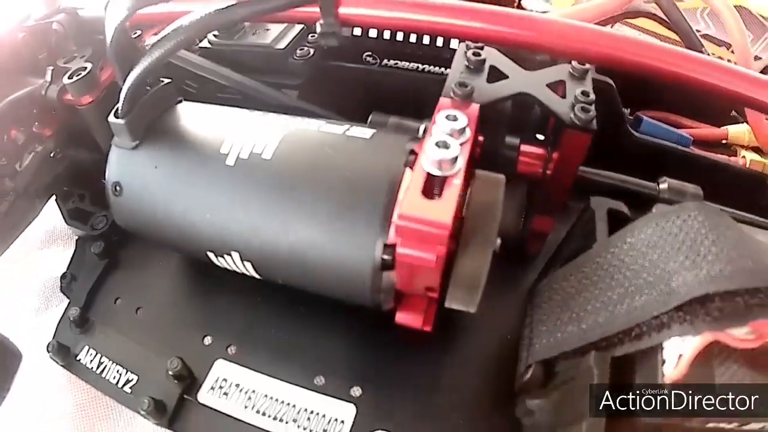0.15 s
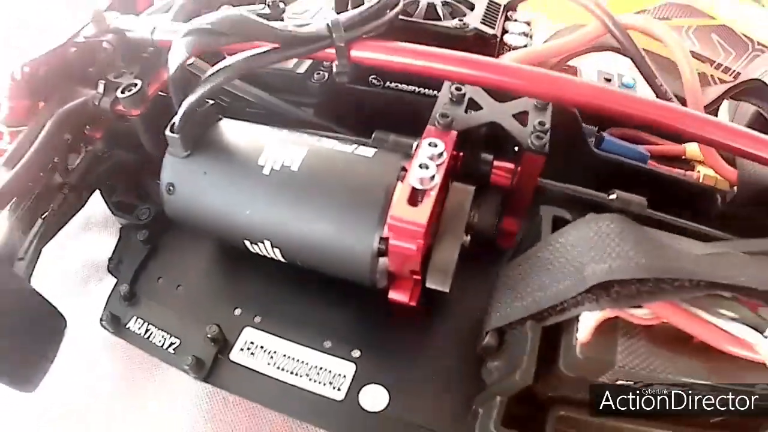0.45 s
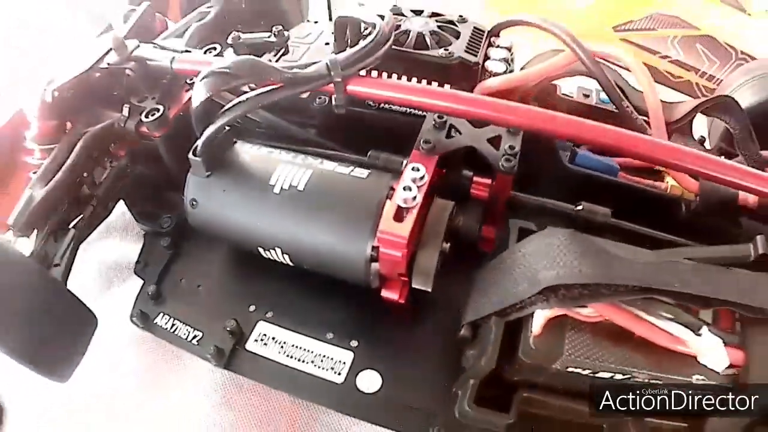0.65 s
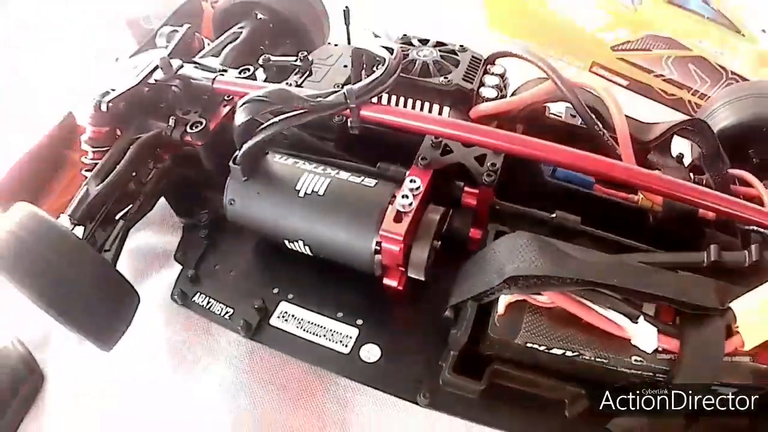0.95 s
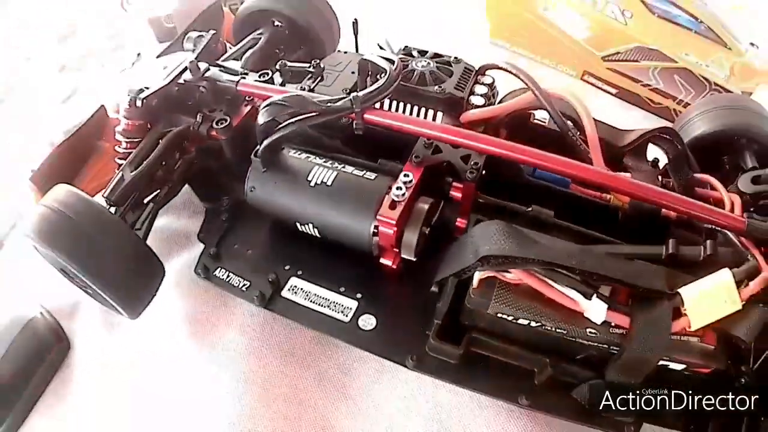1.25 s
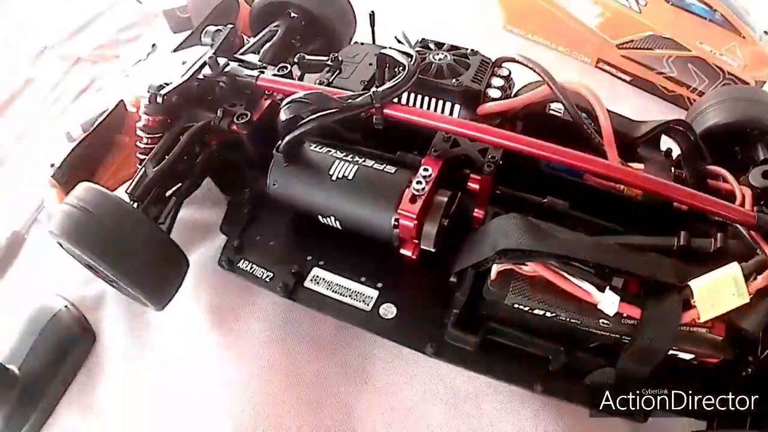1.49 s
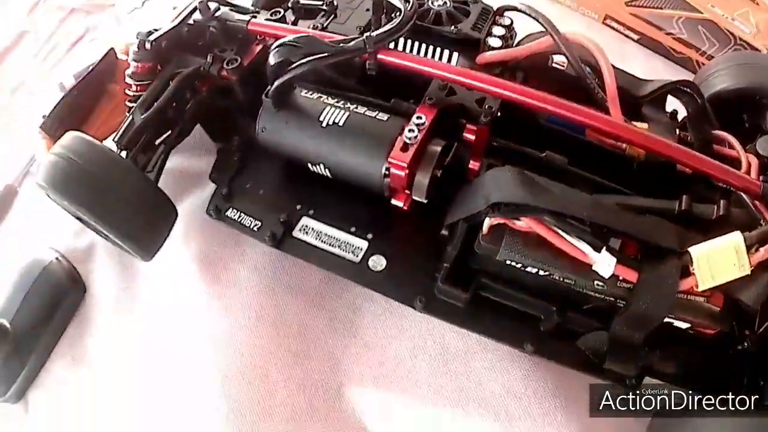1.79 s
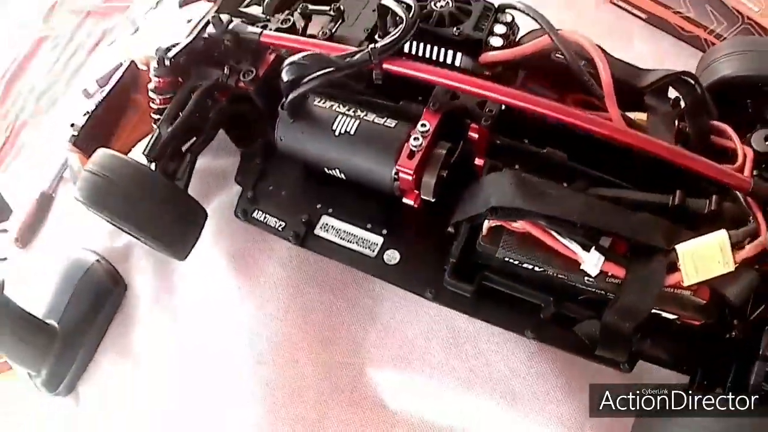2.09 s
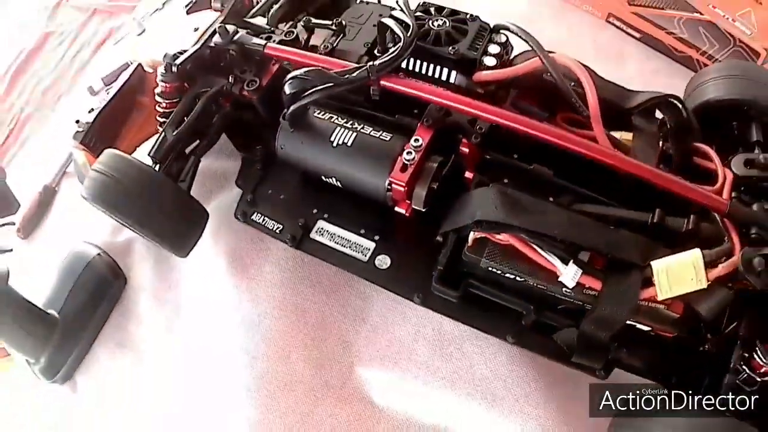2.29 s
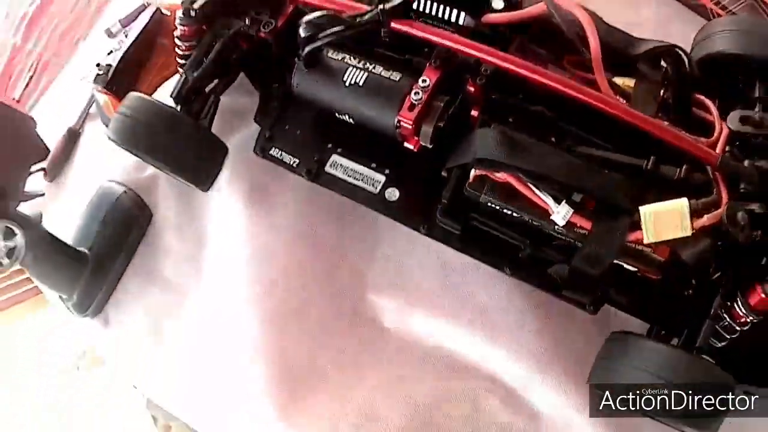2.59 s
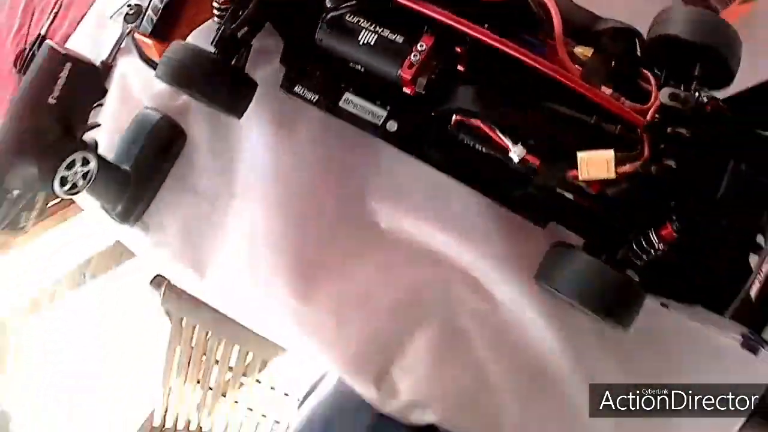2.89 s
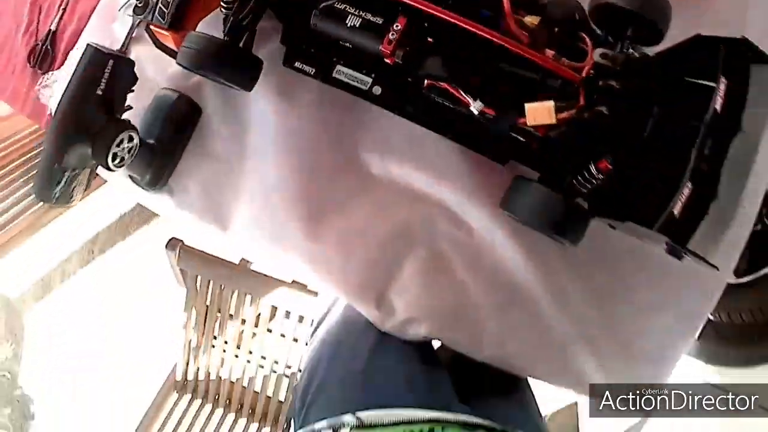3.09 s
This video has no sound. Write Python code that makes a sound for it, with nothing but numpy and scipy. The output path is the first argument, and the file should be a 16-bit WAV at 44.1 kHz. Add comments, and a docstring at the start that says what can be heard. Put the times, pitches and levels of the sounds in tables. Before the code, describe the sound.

The gears of a radio-controlled car coast down, whirring with quick, irregular clicks and a low hum. Loudest at first, the sound grows steadily lower, duller and quieter, heard from close up in a quiet room.

```python
"""In a room, close to a model car whose drivetrain coasts down with its wheels off the ground.
Two spinning shafts are a little off balance and shake the chassis with a low hum. The gears whirr as
tooth clicks on tooth, and they chatter in short uneven bursts as the slack between them is taken up.
The clicks ring through the chassis, and the sound sinks in pitch and fades as the shafts slow."""
import sys
import numpy as np
from scipy import signal
from scipy.fft import rfft, irfft, next_fast_len
from scipy.io import wavfile
from scipy.ndimage import uniform_filter1d, minimum_filter1d

SR = 44100
rng = np.random.default_rng(int(sys.argv[2]) if len(sys.argv) > 2 else 0)


def unload_wav(signal):
    """Save mono or channel-first audio to the path in sys.argv[1] as 16-bit WAV at rate SR, clipped to [-1, 1]."""
    wavfile.write(
        sys.argv[1],
        SR,
        np.round(np.clip(np.atleast_2d(signal).T, -1, 1) * 32767).astype(np.int16),
    )


N = 143325
T = np.arange(N) / SR
SIZE = next_fast_len(N + SR)  # a spare second gives filters room to ring out
HZ = np.maximum(np.arange(SIZE // 2 + 1) * SR / SIZE, 1)
TEETH = 42  # on the gear of the main shaft

# How fast the main shaft spins: (time [s], speed [turns per second])
SHAFT_SPEED = [(0, 60), (.5, 50.5), (1, 41.2), (1.5, 33.3), (2, 26.5), (2.6, 20.3), (3.25, 15)]


def from_db(db):
    """Turn decibels into a number to multiply by."""
    return 10 ** (np.asarray(db) / 20)


def rms_one(x):
    """Scale a signal so that its average power is 1."""
    return x / np.sqrt(np.mean(x ** 2) + 1e-20)


def in_time(rows):
    """Join (time, value) points with straight lines, giving a value for every sample."""
    return np.interp(T, *np.transpose(rows))


def colour(points):
    """Join (frequency, level) points into a tone colour: a level in dB for every frequency."""
    hz, db = np.transpose(points)
    return np.interp(np.log(HZ), np.log(hz), db)


def drift(rate_hz):
    """A random wobble of about size 1, mostly slower than rate_hz."""
    spectrum = rfft(rng.standard_normal(SIZE)) / (1 + (HZ / rate_hz) ** 2)
    return rms_one(irfft(spectrum, SIZE)[:N])


def shape_tone(x, gain_db):
    """Turn each frequency up or down, so that ringing only follows a click (a minimum-phase filter)."""
    cepstrum = irfft(np.log(from_db(gain_db)), SIZE)
    cepstrum[1:SIZE // 2] *= 2
    cepstrum[SIZE // 2 + 1:] = 0
    return irfft(rfft(x, SIZE) * np.exp(rfft(cepstrum)), SIZE)[:N]


def shaft_shake(turns):
    """Two off-balance shafts hum low falling tones; the faster one wavers and dies away sooner."""
    # Hum of the main shaft: (time [s], level [dB])
    main_levels = [(0, -31), (.45, -32.5), (1, -35), (1.4, -39.5), (2, -43), (2.4, -57.5), (3.25, -53.5)]
    # Hum of the faster shaft: (time [s], level [dB])
    fast_levels = [(0, -37.5), (.25, -32), (.4, -41.5), (.55, -32.5), (.85, -39), (1, -43), (1.25, -45),
                   (1.85, -48.5), (2.2, -60), (3.25, -69)]
    speed_ratio, octave_db = 2.82, -30.5
    angle = 2 * np.pi * turns
    main_hum = from_db(in_time(main_levels)) * (np.sin(angle) + from_db(octave_db) * np.sin(2 * angle))
    fast_hum = from_db(in_time(fast_levels)) * np.sin(speed_ratio * angle + drift(16))
    return np.sqrt(2) * (main_hum + fast_hum)


def tooth_clicks(turns, spread_db=2, grit_db=-2):
    """Each gear tooth clicks as it meets another, uneven in time and strength, with fine grit between."""
    count = int(turns[-1] * TEETH)
    timing, strength = rng.standard_normal((N, 2))[:count].T
    contacts = np.arange(count) + .14 * timing  # early or late by a small part of a tooth spacing
    starts = np.searchsorted(turns * TEETH, contacts).clip(0, N - 1)
    clicks = np.zeros(N)
    clicks[starts] = from_db(spread_db * strength.clip(-1.5, 1.5)) * rng.choice([-1, 1], N)[:count]
    clicks /= np.sqrt(in_time(SHAFT_SPEED))  # keeps the power even as the clicks thin out
    return rms_one(rms_one(clicks) + from_db(grit_db) * rng.standard_normal(N))


def chassis_ring(force, tone):
    """A force makes the chassis ring at its own pitches, on top of the given tone colour."""
    # Peaks and dips in how the chassis rings: (frequency [Hz], width [Hz], boost [dB])
    resonances = [(632, 45, 4.5), (628, 20, -9.5), (660, 27, -1.5), (745.5, 51, 4), (896, 39, -4),
                  (992, 70, 5), (1320, 57, 3), (1484, 100, 0), (1778, 70, 2), (2420, 68, -0.5),
                  (3200, 220, 2.5)]
    db = colour(tone) + sum(boost / (1 + (2 * (HZ - hz) / width) ** 2) for hz, width, boost in resonances)
    average_db = 10 * np.log10(np.mean(from_db(db) ** 2))
    return shape_tone(force, db - average_db)


def gear_whirr(turns, speed):
    """Tooth clicks blur into a whirr that dulls as it slows, with the growl of a slower pair of gears."""
    # Loudness of the whirr: (time [s], level [dB])
    levels = [(0, -16), (.4, -20.5), (.6, -21.5), (.85, -22.5), (1.25, -27), (1.7, -30), (2.1, -29.5),
              (2.7, -33), (3.0, -36), (3.25, -33.5)]
    # Tone colour at the highest speed: (frequency [Hz], level [dB])
    fast_tone = [(70, -17), (200, -9), (450, -8.5), (700, -4), (1300, -2.5), (1700, -6.5), (2400, -10),
                 (3100, -17), (4000, -25.5), (5800, -32.5), (10500, -44.5), (14000, -49.5)]
    # Tone colour at the lowest speed: (frequency [Hz], level [dB])
    slow_tone = [(70, -11.5), (200, -22.5), (430, -17), (700, -1.5), (1050, 2), (1600, -6), (2300, -8.5),
                 (3100, -19.5), (4000, -29), (5800, -32), (10500, -46), (14000, -45)]
    flutter_db, flutter_hz = 2.5, 50
    growl_cycles_per_turn, growl_db, growl_width_hz = 23, -5.5, 140
    loudness = from_db(in_time(levels) + flutter_db * drift(flutter_hz))
    fast_share = (speed - speed.min()) / np.ptp(speed)  # 1 at the start, 0 at the end
    force = loudness * tooth_clicks(turns)
    whirr = chassis_ring(force * fast_share, fast_tone) + chassis_ring(force * (1 - fast_share), slow_tone)
    angle = 2 * np.pi * growl_cycles_per_turn * turns
    growl = drift(growl_width_hz) * np.sin(angle) + drift(growl_width_hz) * np.cos(angle)  # a rough tone
    return whirr + from_db(growl_db) * loudness * fast_share * growl


def bursts(times, levels_db, widths_s):
    """A loudness curve that swells briefly each time the teeth press together and part again."""
    power = np.zeros(N)
    for time, db, width in zip(times, levels_db, widths_s):
        middle = int(time * SR)
        near = slice(max(middle - SR // 20, 0), middle + SR // 20)
        power[near] += from_db(db) ** 2 * np.exp(-((T[near] - time) / width) ** 2)
    return np.sqrt(power)


def tooth_chatter(turns):
    """Each time the slack is taken up, the teeth knock the chassis, rasp brightly and chirp."""
    # Bursts of chatter, with levels before each part's own offset:
    # (time [s], half-length of the rasp [s], knock level [dB], chirp level [dB], rasp level [dB])
    events = [(0.032, 0.0041, -11.5, -13.5, -19), (0.069, 0.0013, -26, -15, -22),
              (0.115, 0.0017, -22, -7, -10.5), (0.136, 0.0012, -21, -27, -33),
              (0.147, 0.0026, -16, -24, -27), (0.184, 0.0023, -16, -13, -19),
              (0.221, 0.0022, -22, -11.5, -19.5), (0.259, 0.0037, -15, -24, -23),
              (0.295, 0.0028, -16, -15.5, -21), (0.34, 0.004, -19, -32, -29),
              (0.353, 0.0029, -15, -20.5, -24), (0.372, 0.0025, -17, -20, -23.5),
              (0.412, 0.0015, -12.5, -13, -23), (0.447, 0.0039, -12, -19.5, -25.5),
              (0.476, 0.0017, -19.5, -33, -44), (0.491, 0.0029, -18, -16, -22),
              (0.529, 0.003, -29, -16.5, -23), (0.546, 0.0017, -19.5, -20.5, -27),
              (0.586, 0.002, -14.5, -22, -24), (0.618, 0.0042, -18, -20, -28),
              (0.659, 0.0046, -36, -21, -32), (0.689, 0.004, -17, -27, -27),
              (0.736, 0.0015, -6.5, -14, -23), (0.766, 0.0027, -21, -20.5, -37),
              (0.798, 0.0032, -17, -25, -31), (0.812, 0.0022, -12, -31, -46),
              (0.83, 0.002, -14.5, -22.5, -27), (0.85, 0.00095, -20, -37, -43),
              (0.872, 0.0034, -14, -29, -27.5), (0.909, 0.0026, -16.5, -23.5, -30),
              (0.947, 0.0032, -25.5, -27, -31), (0.969, 0.0023, -12.5, -25, -37),
              (1.012, 0.0082, -18.5, -28, -34), (1.046, 0.0019, -25, -27, -30),
              (1.064, 0.0024, -22, -25, -31.5), (1.083, 0.0044, -31, -32, -36),
              (1.116, 0.0053, -28, -27, -39), (1.144, 0.0029, -16.5, -23, -29),
              (1.195, 0.0037, -20, -24.5, -31.5), (1.221, 0.0029, -26, -29, -46),
              (1.243, 0.0018, -17, -17.5, -29), (1.277, 0.0039, -21.5, -22.5, -31.5),
              (1.326, 0.0039, -31, -23, -34), (1.366, 0.0024, -34, -29, -30),
              (1.396, 0.0043, -23, -28, -31.5), (1.42, 0.004, -18.5, -24, -34),
              (1.446, 0.0011, -30, -26, -33), (1.476, 0.0043, -35, -33, -41),
              (1.518, 0.0098, -26, -30.5, -38), (1.543, 0.0044, -20, -33, -37),
              (1.576, 0.0052, -20.5, -26, -35), (1.608, 0.0056, -22, -29.5, -38),
              (1.645, 0.0032, -21.5, -27, -32.5), (1.674, 0.0027, -19, -25, -33.5),
              (1.711, 0.0035, -24, -28, -32.5), (1.732, 0.0024, -16, -25.5, -36),
              (1.764, 0.01, -24, -29, -37), (1.809, 0.0032, -20.5, -25.5, -28.5),
              (1.848, 0.0047, -20, -37, -37.5), (1.884, 0.0017, -14, -28, -31),
              (1.919, 0.0038, -23, -23.5, -38.5), (1.953, 0.0028, -21, -25, -33),
              (1.997, 0.0025, -30, -22, -37), (2.032, 0.0018, -19, -22, -30),
              (2.081, 0.0043, -27, -25.5, -33), (2.114, 0.0055, -22, -36, -38),
              (2.155, 0.0023, -16, -25, -38), (2.194, 0.0041, -23, -31, -37.5),
              (2.233, 0.0053, -23, -31.5, -38.5), (2.281, 0.0036, -22, -26, -37),
              (2.304, 0.0026, -30, -37, -53), (2.322, 0.0043, -22, -29, -38.5),
              (2.347, 0.0068, -24.5, -35, -36.5), (2.38, 0.0044, -20.5, -41, -38.5),
              (2.419, 0.0047, -19, -30, -40.5), (2.469, 0.0038, -19.5, -28, -36.5),
              (2.518, 0.0023, -17.5, -30, -31.5), (2.531, 0.0023, -21.5, -36, -53),
              (2.567, 0.0035, -22, -30, -39), (2.598, 0.0096, -24, -34, -42.5),
              (2.621, 0.0036, -21.5, -34, -37.5), (2.665, 0.0032, -34, -48, -56),
              (2.679, 0.0026, -19, -46, -37), (2.718, 0.013, -23.5, -36, -41),
              (2.755, 0.0025, -19.5, -37, -49), (2.783, 0.0035, -22, -38, -38.5),
              (2.802, 0.0037, -20.5, -38, -44), (2.86, 0.0041, -21.5, -34, -37.5),
              (2.891, 0.0045, -24.5, -32, -42.5), (2.918, 0.0056, -24.5, -36, -54),
              (2.961, 0.0035, -23.5, -29, -42), (2.988, 0.011, -26, -39, -44),
              (3.057, 0.012, -27, -43, -49.5), (3.109, 0.0046, -29, -37, -49),
              (3.142, 0.0052, -24.5, -33, -48.5), (3.202, 0.0039, -25.5, -36, -50),
              (3.229, 0.0045, -26, -35, -46)]
    # Tone colour of the dull knock: (frequency [Hz], level [dB])
    knock_tone = [(60, -18), (160, -20.5), (260, -21), (450, -14), (680, -0.5), (1050, 3), (1600, -7),
                  (2300, -9), (3200, -30.5), (5000, -35), (14000, -57)]
    # Tone colour of the bright rasp: (frequency [Hz], level [dB])
    rasp_tone = [(200, -23), (900, -10.5), (2200, 5.5), (3200, -1), (4200, -8.5), (5700, -12.5),
                 (7000, -29.5), (10500, -25), (14000, -34.5), (16000, -28.5)]
    # Tone colour of the chirp: (frequency [Hz], level [dB])
    chirp_tone = [(600, -10), (1300, -14), (1900, -0.5), (2500, -5.5), (3200, -11), (4300, -19.5),
                  (5800, -27), (7000, -34.5), (10500, -29), (14000, -30.5)]
    # Tones that make up the chirp: (pitch [multiple of the rate at which teeth meet], level [dB])
    harmonics = [(1, 1), (2, -3.5), (3, -5.5), (4, -13.5), (5, -14), (6, -13.5)]
    knock_offset_db, rasp_offset_db, chirp_offset_db = -1, 3.5, 5
    wobble_radians, wobble_hz = 2.2, 26.8
    times, widths, knock_db, chirp_db, rasp_db = np.transpose(events)
    knock = bursts(times, knock_db + knock_offset_db, .89 * widths) * tooth_clicks(turns)
    hard_clicks = tooth_clicks(turns, spread_db=5, grit_db=-12.5)
    rasp = bursts(times, rasp_db + rasp_offset_db, widths) * hard_clicks
    whine = sum(from_db(db) * np.sin(2 * np.pi * k * TEETH * turns + wobble_radians * drift(wobble_hz))
                for k, db in harmonics)
    chirp = bursts(times, chirp_db + chirp_offset_db, 1.28 * widths) * whine
    ringing = chassis_ring(knock, knock_tone) + chassis_ring(rasp, rasp_tone)
    return ringing + shape_tone(chirp, colour(chirp_tone))


def room_hush():
    """The faint background of the room: a low rumble with a trace of hiss."""
    # Tone colour of the background: (frequency [Hz], level [dB])
    tone = [(20, -16.5), (60, 2.5), (150, -10.5), (500, -52), (3000, -16), (14000, -61)]
    return from_db(-54) * rms_one(shape_tone(rng.standard_normal(N), colour(tone)))


def room_echo(x):
    """Sound bounces around the room and leaves a short, blurred tail."""
    fade_s, echo_db = .22, -14.5  # the tail drops 60 dB in fade_s
    tail = rng.standard_normal(SR // 2) * from_db(-60 * T[:SR // 2] / fade_s)
    return from_db(echo_db) * signal.fftconvolve(x, tail / np.linalg.norm(tail))[:N]


def scene():
    """The slowing gears and shafts, over the hush of the room."""
    speed = in_time(SHAFT_SPEED)
    turns = np.cumsum(speed) / SR  # how many turns the main shaft has made so far
    gears = gear_whirr(turns, speed) + tooth_chatter(turns)
    hush = room_hush()
    return (gears + room_echo(gears) + shaft_shake(turns) + hush)[None]


def record(dry):
    """The microphone softens the treble, a limiter holds down the peaks, and the very top is cut off."""
    dip_hz, dip_width_hz = 8050, 1380
    ceiling, cutoff_hz = .5, 16400
    dip_db = -22 * np.exp(-abs((HZ - dip_hz) / dip_width_hz) ** 3)
    droop_db = -3.5 * np.maximum(HZ - 13300, 0) / 1000  # 3.5 dB less for each kHz above 13.3 kHz
    sound = shape_tone(dry[0], dip_db + droop_db)
    needed_gain = ceiling / np.maximum(abs(sound), ceiling)
    smooth_gain = uniform_filter1d(minimum_filter1d(needed_gain, size=129), size=129)
    low_pass = signal.cheby2(12, 70, cutoff_hz, fs=SR, output="sos")
    return signal.sosfilt(low_pass, sound * smooth_gain)[None]


dry = scene()
out = record(dry)
unload_wav(out)
```